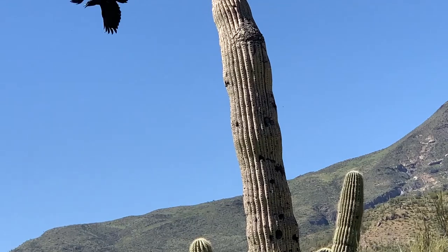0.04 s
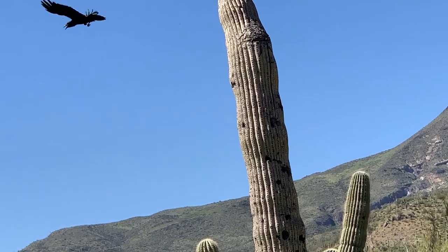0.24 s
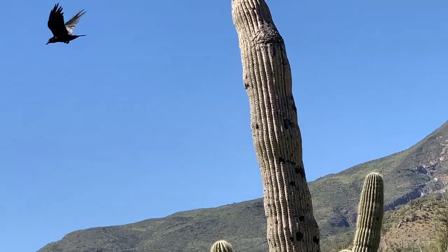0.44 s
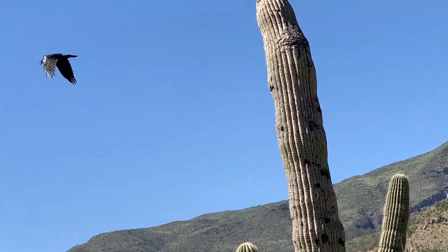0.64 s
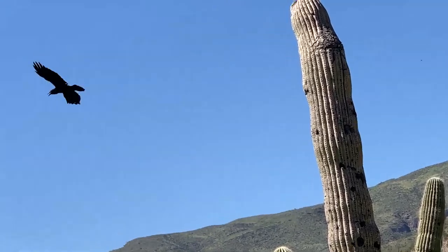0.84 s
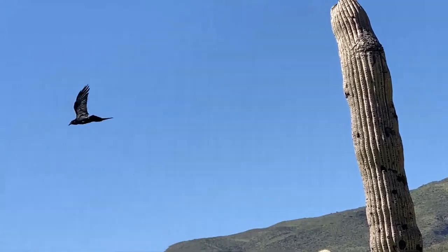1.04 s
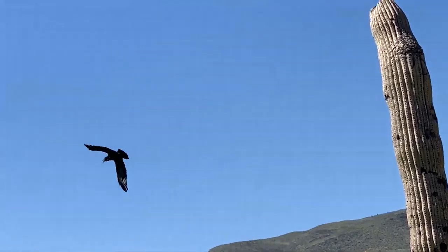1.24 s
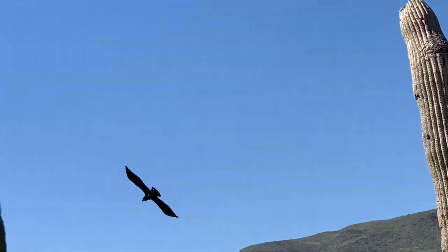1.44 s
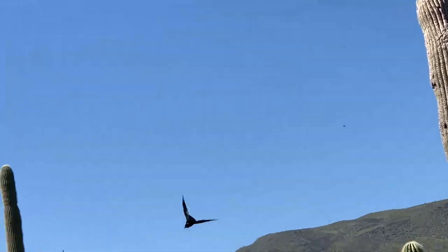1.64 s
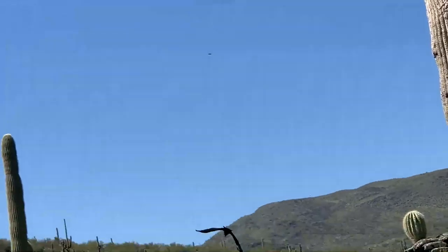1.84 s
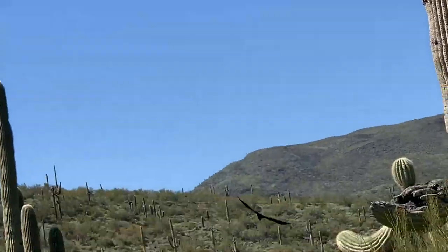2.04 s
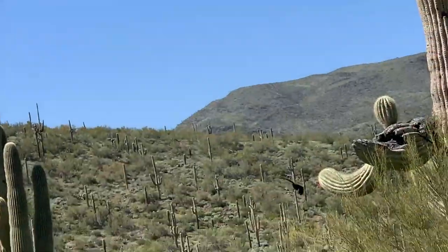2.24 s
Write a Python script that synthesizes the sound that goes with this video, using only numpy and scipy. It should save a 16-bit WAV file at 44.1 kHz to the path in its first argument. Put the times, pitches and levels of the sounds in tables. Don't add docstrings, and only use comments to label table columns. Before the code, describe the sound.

Four hoarse, nasal raven caws about half a second apart, the first loudest, in open desert with faint distant echoes; soft wing whooshes and low wind on the microphone, quiet air underneath.

```python
import sys
import numpy as np
from scipy import signal
from scipy.fft import rfft, irfft, next_fast_len
from scipy.io import wavfile
from scipy.ndimage import uniform_filter1d, map_coordinates

SR = 44100
rng = np.random.default_rng(int(sys.argv[2]) if len(sys.argv) > 2 else 0)


def undo_db(level):
    steps = np.asarray(level, float) / 20
    return 10 ** steps


def to_wav(sig):
    pcm = np.clip(np.atleast_2d(sig), -1, 1) * 32767
    pcm = np.round(pcm).astype(np.int16)
    wavfile.write(sys.argv[1], SR, pcm.T)


N = 101429
T = np.arange(N) / SR


def unit(x):
    return x / np.sqrt(np.mean(x ** 2) + 1e-20)


def along(points, hz):
    f, v = np.transpose(points)
    return np.interp(np.log(hz + 1), np.log(f + 1), v)


def wobble(rate):
    return map_coordinates(rng.standard_normal(N // 20), [T * rate])


def filtered(x, response):
    m = next_fast_len(N + SR // 2)
    return irfft(rfft(x, m) * response(np.fft.rfftfreq(m, 1 / SR)), m)[..., :N]


def swell(s, length):
    return np.exp(-.5 * ((T - s) / (0.34 * length)) ** 2)


# (f/Hz, likeness 0 to 1)
LIKENESS = [(30, .78), (100, .85), (400, .9), (1600, .6), (5000, .3), (9000, .1), (14000, .4)]


def rush(spectrum, patchy_db):
    z = signal.stft(rng.standard_normal((2, N)), nperseg=512)[2]
    patches = uniform_filter1d(rng.standard_normal(z.shape[1:]), 5, 0)
    patches = uniform_filter1d(patches, 8, 1)
    pair = signal.istft(z * undo_db(patchy_db * unit(patches)), nperseg=512)[1][:, :N]

    def spread(hz):
        angle = np.arccos(np.clip(along(LIKENESS, hz), -1, 1)) / 2
        return undo_db(along(spectrum, hz)) * [np.cos(angle), np.sin(angle)]

    mid, side = filtered(pair, spread)
    return unit(np.array([mid + side, mid - side]))


def tract(throat, f):
    beak_top_hz, beak_steep, far_top_hz = 4507, 4.6, 6290
    peaks = sum((-1) ** i * undo_db(db) * 1j * f * w / (c * c - f * f + 1j * f * w)
                for i, (c, w, db) in enumerate(throat))
    return peaks / np.sqrt(1 + (f / beak_top_hz) ** (2 * beak_steep)) / (1 + (f / far_top_hz) ** 20)


def voice(at, hz, odd_db, tilt_db, rasp_db, throat, rasp_lift=0, chest_db=0, ragged_db=.25):
    jitter, jitter_rate, shimmer_db = .004, 250, .7
    bright_from, breath_bright_hz = 4.2, 1800
    k = np.arange(1, 19)[:, None]
    turn = 2 * np.pi * np.cumsum(hz * (1 + jitter * wobble(jitter_rate)[at])) / SR
    slope_db = tilt_db * np.clip(k - bright_from, 0, 3.5) + chest_db * (k < 3.5)
    gain = np.where(k % 2, undo_db(odd_db), 1) * undo_db(slope_db) * tract(throat, k * hz)
    flutter = map_coordinates(rng.standard_normal((19, 800)), [k + 0 * at, 0 * k + T[at] * 180], order=1)
    ragged = undo_db(ragged_db * np.minimum(k, 9) * flutter)
    tone = np.sum(ragged * np.real(gain * np.exp(1j * k * turn)), axis=0)
    tone = tone / np.sqrt(np.sum(abs(gain) ** 2, axis=0) / 2)
    breath = filtered(rng.standard_normal(N),
                      lambda f: tract(throat, f) * np.hypot(1, rasp_lift * f / breath_bright_hz))
    puffs = unit(breath)[at] * (1 + 1.1 * np.cos(turn))
    return undo_db(shimmer_db * wobble(400)[at]) * tone + undo_db(rasp_db) * puffs


# (t/s, length/s, level/dB, top pitch f/Hz, lean of level from start to end/dB)
RATTLE_NOTES = [(0.199, 0.0037, -21.5, 480, -4), (0.212, .009, -17.5, 480, 0.5),
                (.231, .014, -11.5, 499.1, -3.5), (.249, 0.01996, -11, 512.5, -2),
                (0.2729, 0.023, -14.5, 514.1, -11), (.295, 0.027, -12, 522.3, -9.5),
                (0.329, 0.016, -12.5, 499.4, -10), (.754, 0.0071, -22, 500, -2),
                (0.768, 0.009, -20.5, 482.8, -3), (.788, .014, -16.5, 500, -5),
                (0.804, .018, -16, 507.6, 4.5), (.830, .018, -12.5, 521.3, 0.5),
                (0.85, 0.024, -15, 506, -3.5), (0.877, 0.019, -14.5, 507.6, -4),
                (1.316, 0.0048, -22, 445, -4.5), (1.3318, 0.0087, -21, 460.5, -18.5),
                (1.348, 0.015, -20, 492, -3.5), (1.371, 0.016, -19, 506, -6.5),
                (1.393, .020, -19.5, 505.9, -3), (1.42, .023, -19, 500, -6.5),
                (1.447, 0.026, -19.5, 487.3, -10), (1.846, 0.0055, -23, 412.5, -3),
                (1.86, 0.0079, -18, 465.4, -1), (1.879, 0.018, -20.5, 480.2, -10.5),
                (1.898, 0.023, -18.5, 502.5, -2.5), (1.925, .021, -17.5, 500, -3.5),
                (1.948, .022, -16.5, 500, 0.5), (1.972, .020, -17, 500, 1.5),
                (1.997, 0.017, -21, 453.5, -1.5)]


def rattle():
    rise, fall, top_at = .075, 0.15, 0.5285
    open_s, shut_share, swell_db = .0028, .4, 4
    snap_db, soft_dull = 2.2, .09
    hz, gate, shut, bright_db = np.full(N, 450.), np.zeros(N), np.ones(N), np.zeros(N)
    for s, length, db, top_hz, lean_db in RATTLE_NOTES:
        u = (T - s) / length
        climb = rise * np.cos(np.pi / 2 * np.clip(u / top_at, 0, 1)) ** 2
        drop = fall * np.sin(np.pi / 2 * np.clip((u - top_at) / (1 - top_at), 0, 1)) ** 2
        arch = np.where(u < top_at, climb, drop)
        closing = np.sin(np.pi / 2 * np.clip((s + length - T) / (shut_share * length), 0, 1))
        opened = np.clip((T - s) / open_s, 0, 1) * closing
        hz = np.where(opened > 0, top_hz * (1 - arch), hz)
        level_db = db + lean_db * np.clip(2 * u - 1, -1, 1) - swell_db * (u < top_at) * arch / rise
        gate += opened * undo_db(level_db)
        shut -= opened
        bright_db += (opened > 0) * (snap_db * (1 - 2 * u) + soft_dull * (db + 18.5))
    return hz, gate, shut, bright_db


def strained_voice(at, rows, throat, odd_db):
    s, db, strain_hz = np.transpose(rows)
    hz, level_db = np.interp(T[at], s, strain_hz), np.interp(T[at], s, db)
    slack_hz, tense_hz, fade_s = 355, 385, .006
    faint = np.clip(-29 - level_db, 0, 15)
    chest_db = 25 * np.clip(1 - (T[at] - s[0]) / 0.07, 0, 1)
    sound = voice(at, hz, np.interp(hz, [slack_hz, tense_hz], [0, odd_db]), -1 - .2 * faint,
                  -14 + .8 * faint, throat, rasp_lift=0.18, chest_db=chest_db, ragged_db=.6)
    return undo_db(level_db) * np.clip((s[-1] - T[at]) / fade_s, 0, 1) * sound


# (t/s, level/dB, pitch f/Hz)
STRAINED = [
    [(.183, -54.5, 403.7), (.188, -47, 363.5), (.226, -24.5, 385.1), (.325, -26.5, 397.7),
     (.34, -15.5, 406.4), (.357, -26.5, 418), (.366, -22.5, 355), (.378, -25, 394), (.388, -66, 339)],
    [(.738, -55, 371.3), (.7415, -46.5, 380.5), (.78, -27, 385), (.89, -24.5, 418.8), (.9, -25, 428.5),
     (.916, -24.5, 442), (.921, -20.5, 355), (.942, -28.5, 350.7), (.952, -34, 315)],
    [(1.296, -59.5, 382.2), (1.301, -45, 389), (1.34, -30, 408.7), (1.455, -23, 425.6), (1.466, -18.5, 411),
     (1.482, -26, 421.4), (1.49, -25, 399), (1.505, -32, 385), (1.52, -42, 338)],
    [(1.826, -78, 388.5), (1.831, -45.5, 383.6), (1.875, -32.5, 401.1), (1.985, -28, 430.4),
     (1.998, -22, 429.1), (2.014, -20.5, 437.2), (2.022, -23.5, 379.6), (2.04, -25.5, 360),
     (2.065, -44, 344)],
]
# (f/Hz, width/Hz, level/dB)
CAW_THROATS = [
    [(500, 180, -16.5), (820, 510, -11), (1490, 92.6, 7.5), (2246, 73, -36.5), (2250, 140, -30),
     (3120, 94, -17.5), (3830, 200, -26.5), (4190, 640, -33), (5880, 800, -40.5)],
    [(604, 900, -23.5), (915, 370, -2.5), (1535, 160, 10), (1800, 220, -3.5), (2530, 690, -17.5),
     (3473, 86, -18.5), (3730, 200, -37), (4300, 150, -16), (6000, 700, -37)],
    [(480, 120, -16), (923, 217, 0), (1344, 225, 9.5), (2020, 570, -11.5), (2350, 320, -38),
     (3230, 178, -9.5), (3670, 400, -43), (4250, 150, -15), (5926, 700, -36)],
    [(480, 130, -26), (1020, 254, -1), (1416, 125, 9), (2024, 150, -16.5), (2376, 230, -39.5),
     (3056, 160, -14.5), (3420, 200, -49.5), (3950, 510, -20), (6040, 700, -32)],
]
# (left over right/dB, left lag/samples)
CAW_BEARING = [(2.2, -2), (.3, -1.5), (.5, -.8), (.1, -.2)]
ODD_OVERTONES = [-17, -10, -1.5, 2.5]


def raven():
    hz, gate, shut, bright_db = rattle()
    out = np.zeros((2, N))
    side = np.array([[.5], [-.5]])
    for rows, throat, (pan_db, lag), odd_db in zip(STRAINED, CAW_THROATS, CAW_BEARING, ODD_OVERTONES):
        at = np.flatnonzero((T > rows[0][0]) & (T < rows[-1][0]))
        notes = gate[at] * voice(at, hz[at], 0, bright_db[at], -25, throat, rasp_lift=1)
        call = np.zeros(N)
        call[at] = notes + shut[at] * strained_voice(at, rows, throat, odd_db)
        out += filtered(call, lambda f: undo_db(pan_db * side) * np.exp(-2j * np.pi * f * lag * side / SR))
    return out


# (t/s, length/s, level/dB, pitch f/Hz, width as share of pitch)
WING_STROKES = [
    (0.096, 0.079, -42, 530.6, 0.15),
    (0.577, 0.075, -58.5, 480, 0.88),
    (1.213, 0.039, -47, 707, 0.8),
    (1.234, 0.047, -51.5, 298, .6),
    (1.565, 0.15, -54, 413, 0.16),
    (1.946, 0.16, -45.5, 380, 0.31),
    (2.071, 0.093, -48, 346, 0.42),
    (2.168, 0.19, -49, 454, 0.25),
    (2.269, 0.031, -51.5, 466, 0.63),
]
# (f/Hz, level/dB)
FEATHER_HISS = [(300, -55), (700, 4), (2000, -8), (4500, -31.5), (7000, -48.5)]


def wings():
    out = np.zeros((2, N))
    hiss = undo_db(-13) * rush(FEATHER_HISS, patchy_db=-11.0)
    for s, length, db, hz, width in WING_STROKES:
        hollow = filtered(rng.standard_normal(N), lambda f: 1 / (1 + ((f - hz) / (width * hz)) ** 2))
        out += undo_db(db) * swell(s, length) * (unit(hollow) + hiss)
    return out


# (f/Hz, time to fall 60 dB/s)
GROUND_DECAY = [(300, 0.43), (1500, 0.22), (4000, 0.18), (9000, 0.062)]


def ground(x):
    delay_s = .007
    hz, t, z = signal.stft(rng.standard_normal((2, SR // 2)), SR, nperseg=256)
    tail = signal.istft(z * undo_db(-60 * t / along(GROUND_DECAY, hz)[:, None]), SR, nperseg=256)[1]
    tail[1] = 0.08 * tail[0] + 0.89 * tail[1]
    late = np.pad(x, (round(delay_s * SR), 0))
    return signal.fftconvolve(late[None], tail / np.linalg.norm(tail[0]), axes=1)[:, :N]


# (f/Hz, level/dB)
GROUND_COLOUR = [(500, -10.5), (1500, -8), (3000, -0.5), (6000, 9)]


def near_answer(call):
    near = filtered(call, lambda f: undo_db(along(GROUND_COLOUR, f)))
    turn = np.pi / 2 * wobble(22)
    return undo_db(-8.5) * (ground(near * np.cos(turn)) + ground(near * np.sin(turn)))


# (caw start t/s, delay/s, level/dB)
ROCK_RETURNS = [
    (.18, -0.19, -43.5),
    (.18, 0.24, -49),
    (.73, 0.19, -30.5),
    (1.29, 0.2, -46),
    (1.82, .22, -31.5),
]
# (f/Hz, level/dB)
ROCK_COLOUR = [(700, -5), (1500, 0.5), (2200, 4), (4400, 4.5), (6000, 2.5)]


def returns(call):
    smear_s, caw_s = 0.22, .26
    call = filtered(call, lambda f: undo_db(along(ROCK_COLOUR, f)))
    far = np.zeros(N)
    for s, delay, db in ROCK_RETURNS:
        far += undo_db(db) * np.interp(T - delay, T, call * (T > s) * (T < s + caw_s), 0, 0)
    blur = rng.standard_normal((2, SR // 4)) * undo_db(-60 * T[:SR // 4] / smear_s)
    blur[1] = 0.2 * blur[0] + 0.27 * blur[1]
    return signal.fftconvolve(far[None], blur / np.linalg.norm(blur[0]), axes=1)[:, :N]


# (t/s, length/s, level/dB)
SLOPE_ECHOES = [
    (0.019, 0.28, -54),
    (0.614, 0.26, -66),
    (1.068, 0.44, -54.5),
    (1.689, 0.77, -64.5),
    (2.116, 0.16, -48),
]
# (f/Hz, level/dB per Hz)
SLOPE_COLOUR = [(470, -38.5), (800, -8), (1190, -9), (1590, -6.5), (2330, -22), (4450, -31), (5140, -51.5),
                (7000, -39.5), (9100, -70), (15400, -120)]


def echoes():
    level = sum(undo_db(db) * swell(s, length) for s, length, db in SLOPE_ECHOES)
    return rush(SLOPE_COLOUR, patchy_db=1.5) * level


# (t/s, level/dB)
WIND_STRENGTH = [(0.0, -49.5), (0.08, -48.5), (0.17, -57.5), (0.26, -53), (0.39, -70.5), (0.45, -57),
                 (0.56, -63.5), (0.72, -61), (0.74, -51), (0.97, -64), (1.0, -51.5), (1.66, -64),
                 (2.23, -53.5), (2.3, -66)]
# (f/Hz, level/dB per Hz)
RUMBLE_COLOUR = [(12, -27.5), (20, -2), (39, 1), (70, -5), (200, -10), (260, -39), (440, -120)]
# (f/Hz, level/dB per Hz)
AIR_COLOUR = [(71, -15.5), (120, -0.5), (147, -25.5), (239, 0), (330, -4), (547, -2.5), (726, -12),
              (11300, -31.5), (15100, -29.5)]


def wind():
    s, db = np.transpose(WIND_STRENGTH)
    rumble = unit(undo_db(wobble(39)) * rush(RUMBLE_COLOUR, patchy_db=0.5))
    air = undo_db(-57.5 + wobble(11.0)) * rush(AIR_COLOUR, patchy_db=-3.5)
    return undo_db(np.interp(T, s, db)) * rumble + air


def scene():
    bird = raven()
    call = bird.mean(axis=0)
    return bird + wings() + near_answer(call) + returns(call) + echoes() + wind()


def band_limit(x):
    return signal.sosfilt(signal.butter(12, 15210, fs=SR, output="sos"), x)


def record(dry):
    both = dry.mean(axis=0)
    lost = filtered(both, lambda f: (f > 10600) & (f < 12100) | (f > 15050))
    loud = uniform_filter1d(abs(dry[0]), size=2048) > undo_db(-29)
    loud = uniform_filter1d(1. * loud, size=256)
    lost += loud * filtered(both, lambda f: (f > 6900) & (f < 8100))
    mix = filtered(dry - lost, lambda f: f < 15740)
    return band_limit(mix)


dry = scene()
out = record(dry)
to_wav(out)
```